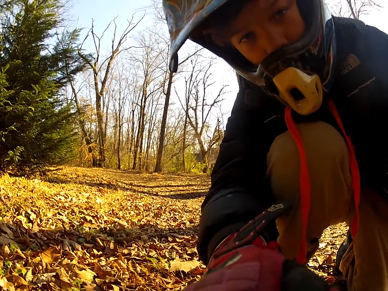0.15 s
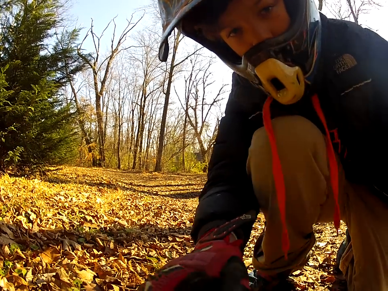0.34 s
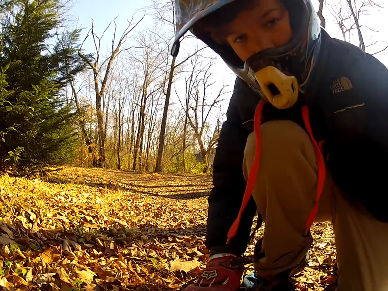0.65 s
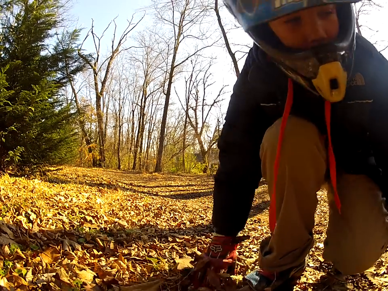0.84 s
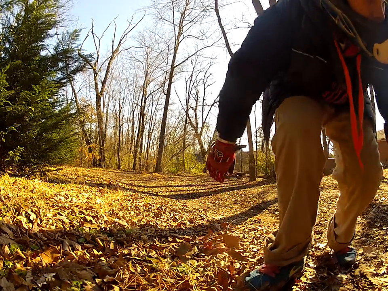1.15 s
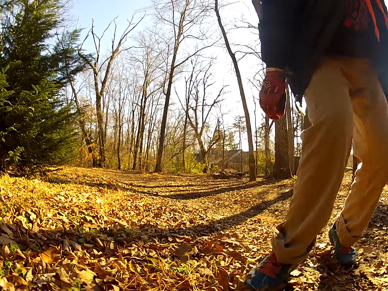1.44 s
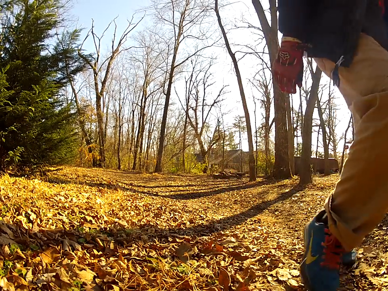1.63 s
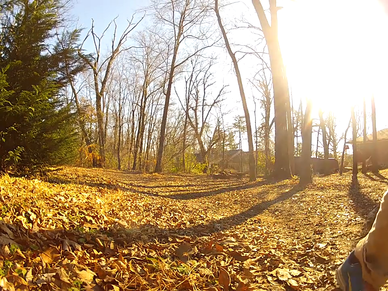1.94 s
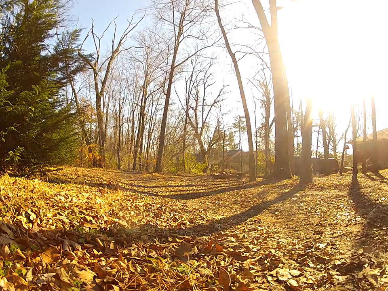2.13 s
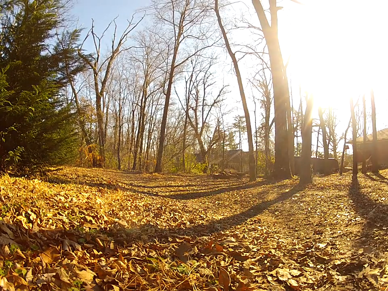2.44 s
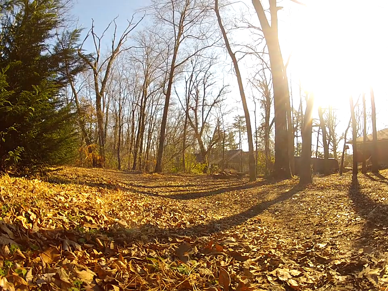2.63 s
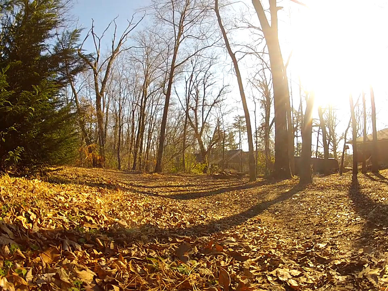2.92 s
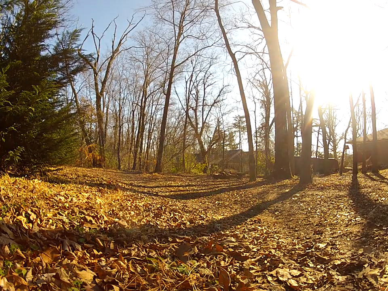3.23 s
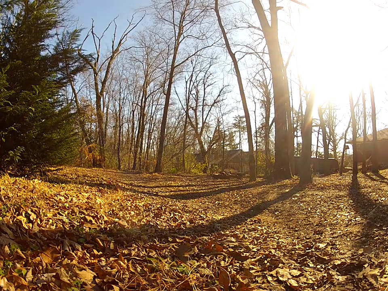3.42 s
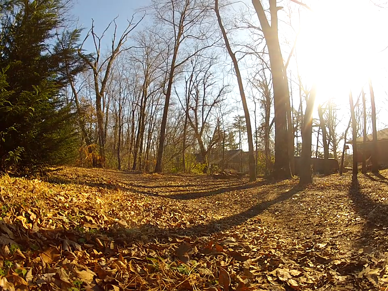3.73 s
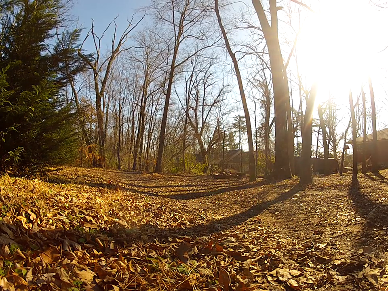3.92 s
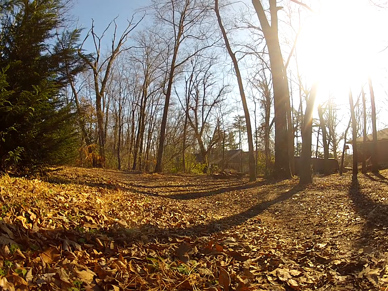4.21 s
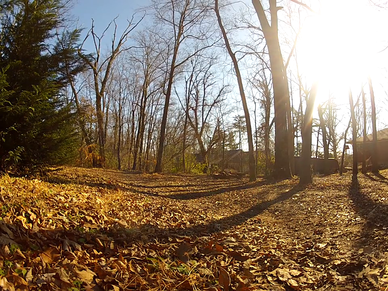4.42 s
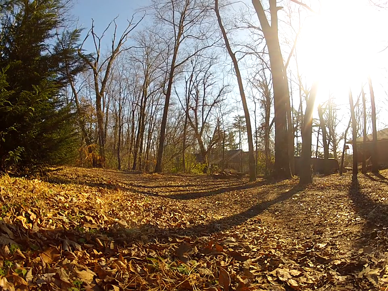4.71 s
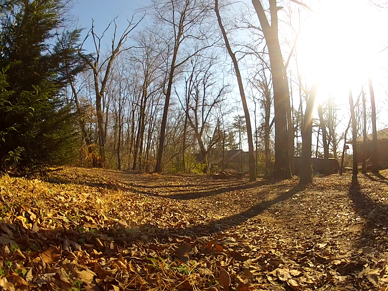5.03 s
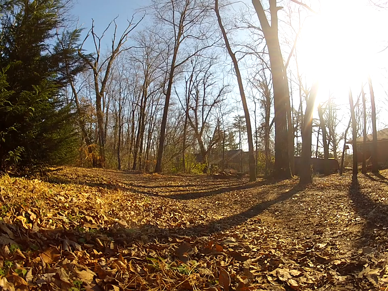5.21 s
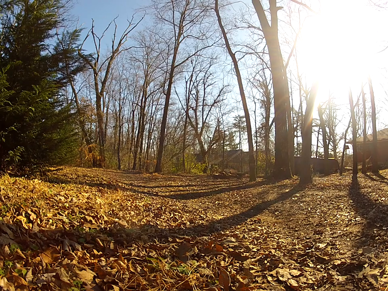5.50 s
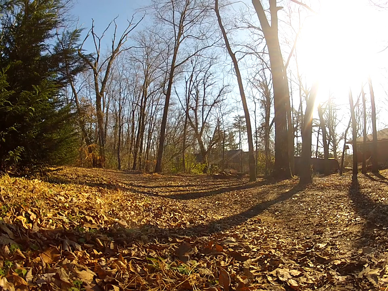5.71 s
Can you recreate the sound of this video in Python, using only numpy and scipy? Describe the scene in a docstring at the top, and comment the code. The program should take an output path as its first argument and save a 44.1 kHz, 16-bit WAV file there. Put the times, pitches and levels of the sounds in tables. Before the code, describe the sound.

Plastic knocks and a glove squeak, leaves swishing, a steady puttering quad engine that suddenly opens up, roars, drops back and pulls gently.

```python
"""Leafy clearing: a single-cylinder four-wheeler idles while a gloved hand sets a cased camera on the ground.
The rider swishes off through dry leaves; the engine opens up with a rasp, revs, drops back, pulls gently on.
Engine: impulses at the firing rate ring damped modes and gate shaped noise. Rider and air: shaped noise.
Bumps: damped modes and grit. The plastic case colours everything with peaks and dips."""
import sys
import numpy as np
from scipy import signal
from scipy.fft import rfft, irfft, next_fast_len
from scipy.io import wavfile
from scipy.ndimage import uniform_filter1d, map_coordinates

SR = 44100
rng = np.random.default_rng(int(sys.argv[2]) if len(sys.argv) > 2 else 0)


def store_pcm(level_fs):
    """Save levels as 16-bit WAV."""
    pcm = np.round(np.clip(level_fs, -1, 1) * 32767).astype(np.int16)
    wavfile.write(sys.argv[1], SR, np.atleast_2d(pcm).T)


N = 258558
TIME = np.arange(N) / SR


def amp(db):
    """Decibels to gain."""
    return 10 ** (np.asarray(db) / 20)


def unit(x):
    """Scale to rms 1."""
    return x / np.sqrt(np.mean(x ** 2) + 1e-20)


def wobble(knots_per_s):
    """Smooth random curve through normally distributed knots."""
    knots = rng.standard_normal(int(N * knots_per_s / SR) + 4)
    return map_coordinates(knots, [TIME * knots_per_s])


def filtered(x, response):
    """Multiply the spectrum of x by response(hz)."""
    size = next_fast_len(N + SR // 2)
    return irfft(rfft(x, size) * response(np.fft.rfftfreq(size, 1 / SR)), size)[:N]


def noise(spectrum):
    """Noise of rms 1; spectrum interpolated on log frequency, 12 dB/octave roll-off below its first row."""
    point_hz, level_db = np.transpose(spectrum)

    def response(hz):
        low_end = np.minimum(hz / point_hz[0], 1) ** 2
        return low_end * amp(np.interp(np.log(hz + 1), np.log(point_hz), level_db))
    return unit(filtered(rng.standard_normal(N), response))


def ring(modes, attack_s, size=SR // 2, sign=1):
    """Damped modes after one blow; sign -1 opposes neighbouring modes, as at the far end of a pipe."""
    t = np.arange(size) / SR
    tone = np.zeros(size)
    for k, (hz, level_db, t60_s) in enumerate(modes):
        decay = amp(level_db - 60 * t / t60_s)
        tone += sign ** k * decay * np.sin(2 * np.pi * hz * t)
    return tone * (1 - np.exp(-t / attack_s))


def swells(strokes):
    """Sum of bell-shaped envelopes, one per stroke."""
    out = np.zeros(N)
    for centre_s, half_s, level_db in strokes:
        out += amp(level_db) * np.exp(-1.03 * ((TIME - centre_s) / half_s) ** 2)
    return out


def beats(cycles, scatter_db):
    """One impulse of random size each time the cycle count passes a whole number."""
    passed = np.diff(np.floor(cycles), prepend=np.floor(cycles[0])) > 0
    return passed * amp(scatter_db * rng.standard_normal(N))


def convolved(pulses, response):
    """Start a copy of the response at every pulse."""
    return signal.fftconvolve(pulses, response)[:N]


def puffs(pulses, rise_s, fall_s):
    """Swelling and dying envelope after each pulse, unit energy (gain squared x s) per unit pulse."""
    t = np.arange(SR // 8) / SR
    shape = (1 - np.exp(-(t / rise_s) ** 2)) * np.exp(-t / fall_s)
    return convolved(pulses, shape / np.sqrt(np.sum(shape ** 2) / SR))


def lagged(x, lag_s):
    """x through a first-order lag."""
    step = 1 / (lag_s * SR)
    return x[0] + signal.lfilter([step], [1, step - 1], x - x[0])


# air spectrum, relative: point_hz, level_db
AIR_SPECTRUM = [(20, -19), (60, 19), (200, 9.5), (500, 0), (1000, -8.5), (2500, -9.5), (5000, -16.5),
                (9000, -22), (15000, -21.5)]


def air():
    """Faint rush of the woods: shaped noise of slowly wandering level."""
    return amp(-57.5 + 0.77 * wobble(5.55)) * noise(AIR_SPECTRUM)


# bumps on the case: start_s, level_db, thud_db (re level), brightness_db_per_octave (knock)
BUMPS = [(0.01, -43, 1, 0), (0.035, -51, -5, 2), (0.086, -50, 4, -1), (0.118, -38, -2, 3),
         (0.288, -35.5, 0.5, -7), (0.298, -38.5, -2.5, -3), (0.32, -35, -8, -6), (0.448, -39.5, -13, 1),
         (0.606, -35.5, -16.5, -7), (0.82, -33, -13.5, 11.5), (0.859, -35, -20, 7)]
# dull modes of the bumped case: mode_hz, level_db, t60_s
THUD_MODES = [(188, 0, 0.013), (299, -8, 0.045), (433, -10, 0.009)]
# hard modes of the bumped case: mode_hz, level_db, t60_s
KNOCK_MODES = [(624, 17.5, 0.007), (1003, 3.5, 0.053), (1216, 6, 0.035), (1740, 5, 0.028),
               (2330, -28, 0.016)]


def bumps():
    """Each bump: dull thud plus short, gritty plastic knock, its modes tilted by the bump's brightness."""
    out = np.zeros(N + SR)
    t = np.arange(SR // 8) / SR
    for start_s, level_db, thud_db, bright_db in BUMPS:
        thud = amp(level_db + thud_db + 7.0) * ring(THUD_MODES, attack_s=0.00042, size=len(t))
        grit = uniform_filter1d(rng.standard_normal(len(t)), size=14) * amp(-60 * t / 0.018)
        modes = [(hz, db + bright_db * np.log2(hz / 1000), t60_s) for hz, db, t60_s in KNOCK_MODES]
        knock = amp(level_db - 18.5) * (ring(modes, attack_s=0.0011, size=len(t)) + 4 * grit)
        out[round(start_s * SR):][:len(t)] += thud + knock
    return out[:N]


# glove and clothing strokes: centre_s, half_length_s (to 1/e), level_db
RUB_STROKES = [(.03, 0.12, -51.5), (.1, 0.044, -61.5), (.44, 0.041, -60.5), (.6, 0.097, -60.5)]
# clothing swishes and steps in the leaves: centre_s, half_length_s (to 1/e), level_db
SWISH_STROKES = [(.74, 0.075, -58), (.89, 0.13, -46.5), (1.62, .1, -60.5), (1.797, 0.022, -48.5),
                 (2.093, 0.025, -45), (5.267, 0.0059, -42.5)]
# glove rub spectrum, relative: point_hz, level_db
RUB_SPECTRUM = [(200, 3.5), (1000, -7), (1900, -2), (2800, -17.5), (3600, -16.5), (4300, -28), (5000, -15),
                (7000, -19.5), (8000, -30.5), (10200, -16.5), (12000, -28), (14000, -18)]
# swish spectrum, relative: point_hz, level_db
SWISH_SPECTRUM = [(300, -16), (1100, 2.5), (1900, -1.5), (2400, 7), (3400, 5), (4300, -1.5), (5200, -0.5),
                  (6900, -3.5), (7600, -5), (8700, -4.5), (10500, -9.5), (12300, -35), (15000, 5.5)]
# broad squeak of the slipping glove, relative: point_hz, level_db
SQUEAK_SPECTRUM = [(400, -23), (950, -4.5), (1450, -10), (1900, 9), (2350, -6), (3700, -4.5), (4200, -16.5),
                   (7600, -22.5), (8350, -13.5), (9500, -21), (10100, -5), (11300, -37), (13900, -10),
                   (14500, -12)]
# narrow squeal through the slip, relative: point_hz, level_db
SQUEAL_SPECTRUM = [(1500, -45), (1750, -19), (1900, 20), (2080, -17), (2500, -60)]
SLIP_START_S, SLIP_END_S, SLIP_RELEASE_S = 0.2066, 0.268, 0.008
SQUEAK_END_DB, SQUEAK_SWELL_DB_PER_S, SQUEAL_DB = -37, 157, -50


def slip():
    """Glove slips off the case: the squeak swells over a steady narrow squeal, then both die away."""
    gate = (TIME > SLIP_START_S) * np.exp(-np.maximum(TIME - SLIP_END_S, 0) / SLIP_RELEASE_S)
    swell = amp(SQUEAK_END_DB - SQUEAK_SWELL_DB_PER_S * np.maximum(SLIP_END_S - TIME, 0))
    squeak = swell * noise(SQUEAK_SPECTRUM)
    squeal = amp(SQUEAL_DB) * noise(SQUEAL_SPECTRUM)
    return gate * (squeak + squeal) * amp(0.37 * wobble(211))


def rider():
    """Glove rubs and squeaks on the case; jacket and boots swish over dry leaves, fast level wobble crackles."""
    rub = swells(RUB_STROKES) * unit(noise(RUB_SPECTRUM) * amp(0.46 * wobble(270)))
    crackle = amp(2.5 * wobble(700))
    swish = swells(SWISH_STROKES) * unit(noise(SWISH_SPECTRUM) * crackle)
    return rub + slip() + swish


# muffler, throttle shut: mode_hz, level_db, t60_s
IDLE_MODES = [(55, -33, 0.36), (96.1, -3.5, 0.36), (139.4, -12.5, 0.16), (173.6, -13.5, 0.13),
              (303, -46, 0.094)]
# turbulent exhaust gas, relative: point_hz, level_db
ROAR_SPECTRUM = [(30, -8), (60, -4), (150, -3), (300, 0), (500, -2), (800, -6), (1250, -6), (2200, -20),
                 (5000, -56)]
# valve gear, relative: point_hz, level_db
CLATTER_SPECTRUM = [(400, -34), (1200, 3.5), (3500, 0.5), (4300, -6.5), (5000, -7), (7000, -9),
                    (9000, -11.5), (15000, -8)]
# idle hunting: firings run ahead and behind
HUNT_CYCLES, HUNT_PERIOD_S, HUNT_LATEST_S = .056, 3.2, .75


def idle(cycles, shut):
    """Each slow firing rings the muffler, with a soft chuff and a rattle of the valve gear."""
    hunt = HUNT_CYCLES * np.cos(2 * np.pi * (TIME - HUNT_LATEST_S) / HUNT_PERIOD_S)
    turns = cycles + .018 - hunt
    fire = beats(turns, scatter_db=.5) * shut
    even_fire = beats(turns, scatter_db=0) * shut
    thump = convolved(fire, ring(IDLE_MODES, attack_s=0.0018))
    chuff = puffs(fire, rise_s=0.00053, fall_s=0.016) * noise(ROAR_SPECTRUM)
    rattle = puffs(even_fire, rise_s=0.0017, fall_s=0.019) * noise(CLATTER_SPECTRUM)
    return amp(-38.0) * thump + amp(-90) * chuff + amp(-82.5) * rattle


# throttle moves: start_s, asked_rate_hz (firings), climb_hz_per_s, shut (0-1)
THROTTLE_MOVES = [(3.18, 22.8, 29.74, 0), (3.513, 32.68, -3.6, 0), (3.969, 38.48, 20.82, 0),
                  (4.843, 37.3, -11.7, 1), (5.315, 26.89, 18.48, 0)]
IDLE_RATE_HZ, FLYWHEEL_LAG_S, COAST_LAG_S = 10.847, .117, 0.089


def drive():
    """Firing rate chases the throttle with flywheel lag; also returns how far the engine coasts (0-1)."""
    asked_hz, shut = np.full(N, IDLE_RATE_HZ), np.zeros(N)
    for start_s, rate_hz, climb_hz_per_s, closed in THROTTLE_MOVES:
        moved = TIME >= start_s
        asked_hz = np.where(moved, rate_hz + climb_hz_per_s * (TIME - start_s), asked_hz)
        shut = np.where(moved, closed, shut)
    return lagged(asked_hz, FLYWHEEL_LAG_S), np.minimum(lagged(shut, COAST_LAG_S), shut)


# muffler box, throttle open: mode_hz, level_db, t60_s
BOX_MODES = [(50, -15, .05), (116, 1, .09)]
# standing waves of the pipe before heating: mode_hz, level_db, t60_s
PIPE_MODES = [(162, 1, 0.056), (283.8, -2.5, 0.074), (406, -14.5, 0.095), (547.4, -18, 0.092),
              (920, -45, 0.027), (1170, -40, 0.029)]
# hot gas raises the pipe's pitch above this firing rate, by this power of the rate
HEAT_FROM_HZ, HEAT_POWER = 30.7, 0.462


def pipe(pulses, rate_hz):
    """Each pulse booms in the box and rings the pipe, pitched up by the hotter gas of high revs."""
    out = np.zeros(N + SR)
    for i in np.flatnonzero(pulses):
        heat = max(rate_hz[i] / HEAT_FROM_HZ, 1) ** HEAT_POWER
        modes = BOX_MODES + [(hz * heat, level_db, t60_s) for hz, level_db, t60_s in PIPE_MODES]
        tone = -ring(modes, attack_s=.0005, size=SR // 16, sign=-1)
        out[i:][:len(tone)] += pulses[i] * tone / np.sqrt(np.sum(tone ** 2) / SR)
    return out[:N]


def exhaust(fire, intake, rate_hz, thump_gain, roar_gain):
    """Firings thump in the pipe, slow ones also boom in the muffler box; turbulent gas roars at each pulse."""
    thump = thump_gain * pipe(fire + 0.22 * intake, rate_hz)
    heavy = np.clip((30 - rate_hz) / 7, 0, 1)  # full at 23 firings/s, none from 30
    boom = amp(-22.5) * convolved(fire * heavy, ring([(111.3, 0.013, 0.3)], attack_s=0.00067))
    roar = roar_gain * puffs(fire + 0.68 * intake, rise_s=0.00083, fall_s=0.026) * noise(ROAR_SPECTRUM)
    return thump + boom + roar


# valve hiss, relative: point_hz, level_db
RASP_SPECTRUM = [(300, -103), (800, -3), (1800, 1.5), (2300, -0.5), (3100, 6.5), (3650, 5.5), (4400, -6.5),
                 (5200, -4.5), (7600, -10), (8500, -2.5), (10500, -12.5), (12000, -19.5), (15000, -1.5)]
# tinny hiss, relative: point_hz, level_db
TIN_SPECTRUM = [(700, -108), (1800, -10.5), (2400, 9.5), (2750, -5.5), (3150, 0), (3650, -9.5), (4400, -2),
                (5200, -19), (6900, -18), (7600, -6), (8600, -19), (9650, -3.5), (10500, -20.5),
                (14400, -16)]
# thin shell shaken by the gas: mode_hz, level_db, t60_s
SHELL_MODES = [(2101, -1, 0.053), (2336, -0.5, 0.068), (9100, -34, 0.0098), (14460, 1.5, 0.019)]
# rasp turns tinny behind the revs, between these firing rates
TINNY_LAG_S, TINNY_FROM_HZ, TINNY_FULL_HZ = 0.44, 13, 42


def rasp(blow, crest, intake, rate_hz, opened):
    """Gas hisses through the opening valve, turns tinny at high revs and shakes a thin shell that rings on."""
    rise = (lagged(rate_hz, TINNY_LAG_S) - TINNY_FROM_HZ) / (TINNY_FULL_HZ - TINNY_FROM_HZ)
    tinny = np.clip(rise, .03, .97)
    jet = puffs(blow, rise_s=.006, fall_s=.0065) + .35 * puffs(crest, rise_s=.0018, fall_s=.0015)
    hiss = np.sqrt(1 - tinny) * (jet + 0.21 * opened) * noise(RASP_SPECTRUM)
    tin_jet = puffs(blow + .15 * intake, rise_s=.004, fall_s=.005)
    tin = np.sqrt(tinny) * (tin_jet + .45 * opened) * noise(TIN_SPECTRUM)
    shell = ring(SHELL_MODES, attack_s=0.00023, size=SR // 16)
    shake = (puffs(blow, rise_s=.002, fall_s=.002) + .5 * opened) * rng.standard_normal(N)
    clean_blow = np.sqrt(SR) * 0.38 * blow  # same waveform at every firing
    zing = np.sqrt(tinny) * convolved(shake + clean_blow, shell / np.linalg.norm(shell))
    return amp(-47) * hiss + amp(-50) * tin + amp(-51.5) * zing


# engine load: time_s, effort_db
EFFORT_CURVE = [(3.25, -6), (3.31, -2.5), (3.5, -3), (4.0, 0.75), (4.81, 2), (4.97, -6), (5.25, -10.5),
                (5.33, -7), (5.43, -13), (5.86, -13)]
# exhaust loudest at one firing rate; loss grows with the square of the octaves from it
EXHAUST_PEAK_HZ, EXHAUST_FALL_DB = 36.8, 9.5
AIRBOX_HZ, AIRBOX_HALF_WIDTH_HZ = 74, 9
VALVE_LEAD_S, CREST_DELAY_S = .0015, .0025


def throttle(cycles, rate_hz, coasting, opened):
    """Firings drive exhaust, drone, throb and rasp; a weaker intake pulse follows one crank turn later."""
    effort_db = np.interp(TIME, *np.transpose(EFFORT_CURVE))
    off_peak_db = EXHAUST_FALL_DB * np.log2(rate_hz / EXHAUST_PEAK_HZ) ** 2

    def gain(level_db, db_per_effort_db, coast_loss_db):
        return amp(level_db + db_per_effort_db * effort_db - coast_loss_db * coasting - off_peak_db)

    size = opened / np.sqrt(rate_hz)
    fire = beats(cycles, scatter_db=.6) * size
    intake = beats(cycles - 1 / 2, scatter_db=1) * size
    pipe_sound = exhaust(fire, intake, rate_hz, gain(-41, 0.76, 8.4), gain(-56, 0.9, 8.4))

    # airbox resonates at the crank rate, twice the firing rate; lift in dB
    tuning = np.exp(-((2 * rate_hz - AIRBOX_HZ) / AIRBOX_HALF_WIDTH_HZ) ** 2)
    airbox = amp((8.25 - 5.5 * coasting) * tuning)
    drone = np.sqrt(2) * gain(-46.5, 0.92, 2.1) * airbox * np.cos(4 * np.pi * cycles - 1.1) * opened
    throb = np.sqrt(2) * gain(-52.5, 1, 0) * np.sin(2 * np.pi * cycles) * opened
    # coasting firings ring the muffler modes of the idle
    overrun = amp(-25) * convolved(fire * coasting, ring(IDLE_MODES, attack_s=0.0036))

    crest = beats(cycles - CREST_DELAY_S * rate_hz, scatter_db=1.4) * size * (1 - coasting)
    # valve opens just ahead of the thump; coasting softens the beat
    blow = beats(cycles + VALVE_LEAD_S * rate_hz, scatter_db=0.83) * size * amp(-6 * coasting)
    rasping = amp(effort_db) * rasp(blow, crest, intake, rate_hz, opened)
    return pipe_sound + drone + throb + overrun + rasping


def engine():
    """One four-stroke cylinder, one firing per cycle of two crank turns; throttle opens after a long idle."""
    rate_hz, coasting = drive()
    cycles = .66 + np.cumsum(rate_hz) / SR
    opened = TIME > 3.22
    return idle(cycles, ~opened) + throttle(cycles, rate_hz, coasting, opened)


def scene():
    """Woods, camera case, rider and engine, one channel."""
    return (air() + bumps() + rider() + engine())[None]


# colour of the closed case: centre_hz, half_width_hz (to 1/e of the dB), level_db
CASE_BANDS = [(1167, 54, 4), (1504, 83, -5.5), (2240, 114, 5.5), (3168, 50, 4.5), (3633, 230, 6.5),
              (5010, 49, 7), (5990, 320, -9.5), (6970, 65, 7.5), (8390, 216, 10), (8860, 34, 13.5),
              (9700, 390, 5), (12740, 3040, -4.5), (11700, 220, 6), (13970, 230, 4), (15200, 170, -17)]
LOW_CUT_HZ, TOP_HZ = 28, 15450


def case(hz):
    """Minimum-phase response of the plastic case: peaks and dips, nothing above TOP_HZ."""
    level_db = sum(db * np.exp(-((hz - centre_hz) / half_hz) ** 2) for centre_hz, half_hz, db in CASE_BANDS)
    cepstrum = irfft(np.log(amp(level_db)))
    # folding makes the case ring after a sound, never before it
    fold = 1 + np.sign(np.fft.fftfreq(len(cepstrum)))
    return np.exp(rfft(cepstrum * fold)) * (hz < TOP_HZ)


def record(dry):
    """The microphone drops deep bass and the top; the case adds ringing peaks and dips."""
    low_cut = signal.butter(2, LOW_CUT_HZ, "high", fs=SR, output="sos")
    return filtered(signal.sosfilt(low_cut, dry[0]), case)[None]


dry = scene()
out = record(dry)
store_pcm(out)
```